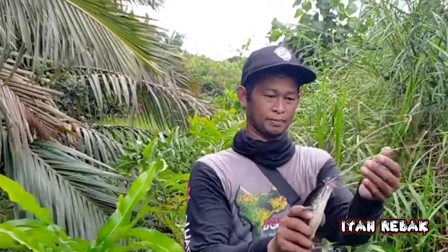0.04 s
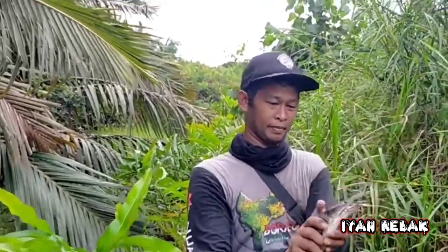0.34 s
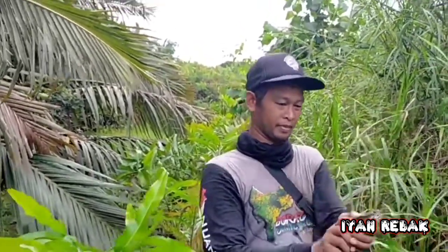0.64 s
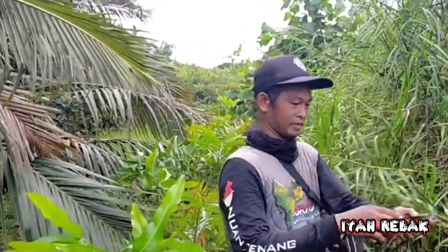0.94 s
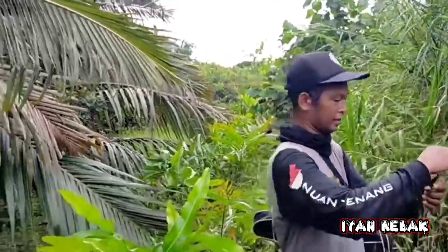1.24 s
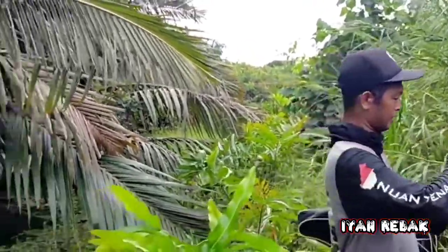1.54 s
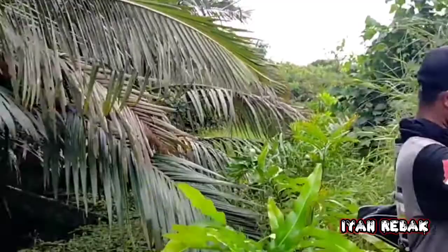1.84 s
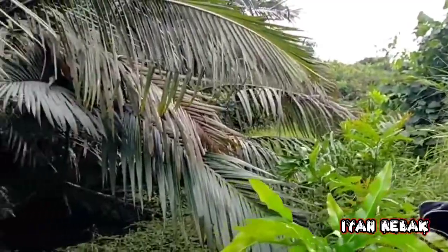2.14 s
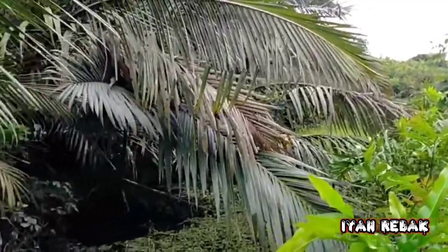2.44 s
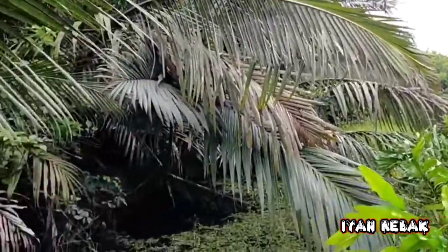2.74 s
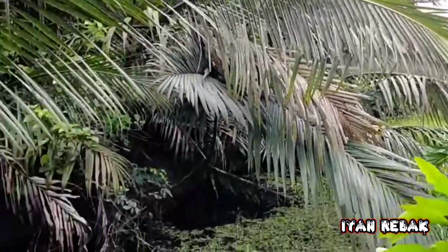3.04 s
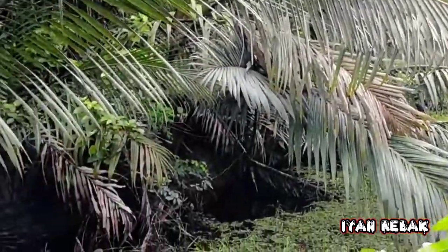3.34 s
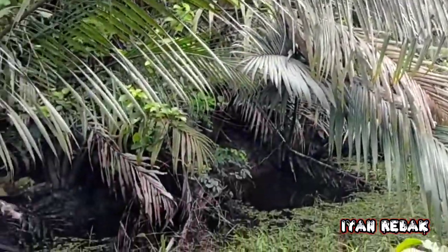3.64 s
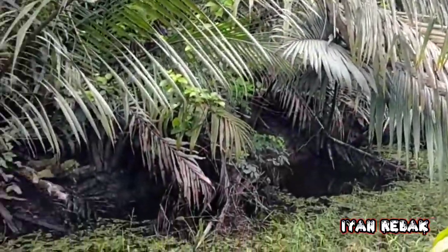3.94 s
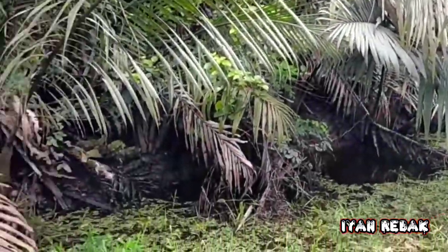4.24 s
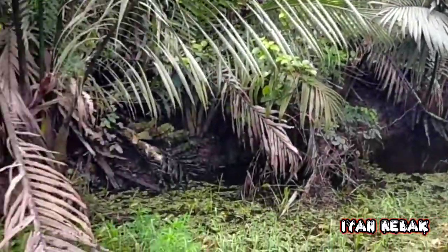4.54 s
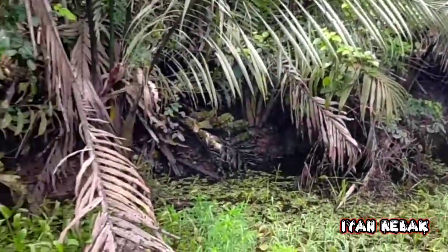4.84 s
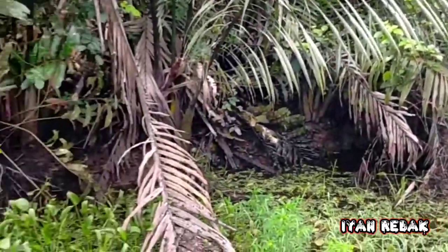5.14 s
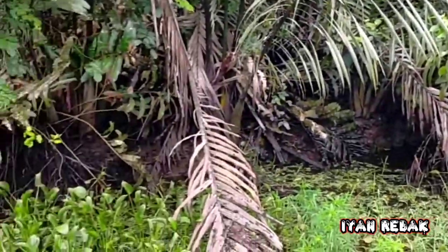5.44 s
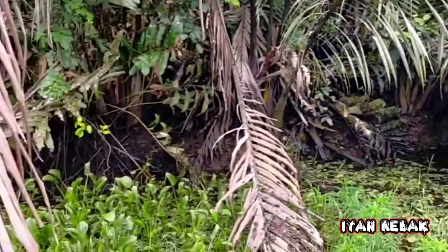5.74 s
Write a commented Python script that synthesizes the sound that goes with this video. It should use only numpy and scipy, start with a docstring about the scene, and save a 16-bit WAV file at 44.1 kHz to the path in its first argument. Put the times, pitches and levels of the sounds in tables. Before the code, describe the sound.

Close rustling, crackles and twig snaps of someone moving through a swamp thicket, under a shrill, throbbing cicada buzz.

```python
"""Cicadas in a swamp thicket

Cicadas drone on clicking tymbals: one holds its note, one sings throbbing phrases, a chorus lies behind.
Someone pushes through tall grass close by: blades swish by friction, dry leaves buckle, twigs snap,
stems knock, and something plops once in the water. A far bird peeps over a faint rumble of air.
The sound is mono, louder on the right."""
import sys
import numpy as np
from scipy import signal
from scipy.fft import rfft, irfft, next_fast_len
from scipy.io import wavfile
from scipy.ndimage import uniform_filter1d

SR = 44100
rng = np.random.default_rng(int(sys.argv[2]) if len(sys.argv) > 2 else 0)


def generate_wav(sig):
    """Save sig (samples, or channels by samples) to the path in sys.argv[1] as 16-bit PCM at SR."""
    pcm = np.round(np.clip(np.atleast_2d(sig).T, -1, 1) * 32767).astype(np.int16)
    wavfile.write(sys.argv[1], SR, pcm)


N = 254898
TIME = np.arange(N) / SR

# All levels are relative; the functions apply further gains.
# spectrum of the air's far hush: f/Hz, level/dB
HUSH_SPECTRUM = [(30, -14.5), (150, -9.5), (300, -8.5), (700, -14), (2000, -10.5), (4000, -39), (9000, -49)]
# spectrum of air buffeting the microphone: f/Hz, level/dB
BUFFET_SPECTRUM = [(5, 6.5), (15, 7.5), (35, -0.5), (60, -1), (95, -7.5), (150, -15.5), (400, -44),
                   (2000, -80)]
# the far bird's peeps: t/s, duration/s, level/dB, f/Hz, upward glide as a fraction of f
PEEPS = [(2.47, 0.09, -54, 3680, 0.023), (2.837, 0.02, -45, 1595, .04)]
# bands of the distant cicada chorus: f/Hz, width/Hz, level/dB
CHORUS_BANDS = [(6240, 160, -60.5), (7164, 580, -51), (7740, 460, -48), (7940, 510, -50),
                (8120, 570, -45.5)]
# modes of the plop: f/Hz, level/dB, 60 dB decay time/s, rise time/s
PLOP_MODES = [(248, -36.5, 0.17, 0.0053), (523, -26, 0.025, 0.0032), (987, -31, 0.022, 0.0046),
              (1130, -38, 0.062, 0.013), (1560, -35, 0.023, 0.0079)]
# spectrum radiated by brushed leaves: f/Hz, level/dB
LEAF_SPECTRUM = [(100, -10.5), (300, -13.5), (700, -8), (1300, -5.5), (2200, 2), (3100, -1.5), (4600, -7),
                 (5500, -10.5), (6800, -2.5), (8500, -5), (10200, -5), (12200, 1.5), (14300, 5),
                 (15500, 7.5)]
# grass sliding past the body: t/s, swish of broad leaves/dB, hiss of dry blades/dB
BRUSH_LEVELS = [(0.0, -48, -49), (0.16, -43.5, -45.5), (0.4, -44.5, -47.5), (0.88, -42.5, -45.5),
                (1.12, -48.5, -50.5), (1.5, -42.5, -45.5), (1.75, -43, -49), (2.2, -48, -53.5),
                (2.5, -55.5, -63), (3.05, -53, -57.5), (3.4, -43, -48), (3.49, -38.5, -41.5),
                (3.76, -35.5, -37), (4.1, -41, -46), (4.75, -37, -43), (4.97, -43.5, -48.5),
                (5.5, -45, -50.5), (5.78, -40.5, -41)]
# stems colliding: t/s, level/dB, f/Hz, 60 dB decay time/s
STEM_KNOCKS = [(1.822, -33, 750, 0.025), (3.477, -23.5, 910, 0.036), (3.655, -44, 380, .05),
               (3.914, -39, 109, .08), (4.022, -28.5, 1130, 0.021), (4.047, -30.5, 860, 0.046),
               (4.049, -35, 300, .04), (4.079, -31, 297, 0.023), (4.225, -35.5, 433, .04),
               (4.353, -35.5, 89.5, 0.11), (4.7318, -30, 1057, 0.014), (4.781, -16, 900, 0.0087)]
# the loudest dry leaves buckling: t/s, snap level/dB, body level/dB, half duration/s
LOUD_CRACKLES = [(0.469, -26, -37, 0.0083), (0.594, -24, -40, 0.0045), (0.8757, -22, -28.5, 0.0023),
                 (0.89, -25.5, -38, 0.029), (1.085, -24.5, -47.5, 0.026), (1.325, -22, -38, .007),
                 (1.3433, -20, -35.5, 0.0087), (1.547, -20, -38, .005), (1.5597, -13, -38, .0041),
                 (1.801, -18, -60, 0.0036), (1.816, -20.5, -37, 0.0075), (2.137, -20.5, -40, 0.0056),
                 (2.404, -35, -43, 0.01), (2.706, -26, -37.5, 0.002), (2.779, -24.5, -38, 0.0083),
                 (2.904, -21.5, -37.5, 0.0029), (3.0053, -26, -39, .004), (3.0356, -25.5, -38, .0059),
                 (3.109, -26.5, -46, 0.011), (3.852, -31, -35, .004), (3.974, -22, -33, .0058),
                 (4.403, -22, -36, 0.007), (4.463, -22, -37, .0055), (4.085, -18.5, -48, 0.006),
                 (4.819, -25, -33, 0.011), (5.115, -23, -49, .005), (5.1751, -23, -42, 0.0077),
                 (5.6126, -21, -38, .0047), (5.7069, -16.5, -38, 0.0088), (5.7714, -20, -38, .005)]
# twigs breaking: t/s, crack peak/dB, ring peak/dB, f/Hz
TWIG_SNAPS = [(1.5486, -20, -24, 3320), (1.6398, -9, -21, 1990), (1.6473, -17, -24.5, 1950),
              (2.458, -38, -37, 3120), (3.8405, -20, -27.5, 2970), (4.7312, -26, -26.5, 1070),
              (4.7571, -8, -23, 3030), (4.7810, -27, -19.5, 3060), (5.1755, -12, -38, 3300)]
# phrases of the throbbing cicada: start/s, end/s, level/dB
PHRASES = [(.78, 1.003, -48), (1.253, 1.56, -46), (1.85, 2.11, -46), (2.422, 2.74, -40.5),
           (2.949, 3.31, -42), (3.543, 3.983, -39.5), (4.15, 4.52, -47), (5.0, 5.39, -42.5),
           (5.573, 5.77, -42)]
# envelope of the cicada that holds its note: t/s, level/dB
HELD_NOTE_LEVEL = [(0.0, -47.5), (0.52, -39.5), (1.25, -43.5), (1.48, -39), (2.3, -41.5), (3.8, -44.5),
                   (4.05, -50), (4.4, -40.5), (4.95, -49), (5.78, -60)]


def gain_of(db):
    """Amplitude ratio of a level in decibels."""
    return 10 ** (np.asarray(db) / 20)


def unit_rms(x):
    """Normalisation to an rms of 1."""
    return x / np.sqrt(np.mean(x ** 2) + 1e-20)


def phase_of(hz):
    """Phase is the time integral of frequency."""
    return 2 * np.pi * np.cumsum(hz) / SR


def follow(rows):
    """Linear interpolation of a table's columns at every sample."""
    times, *columns = np.transpose(rows)
    return [np.interp(TIME, times, column) for column in columns]


def add(mix, start_s, sound):
    """Superposition of a sound on the mix."""
    part = mix[max(round(start_s * SR), 0):][:len(sound)]
    part += sound[:len(part)]


def colour(x, spectrum):
    """Zero-phase filtering by a table of f/Hz, level/dB."""
    f, db = np.transpose(spectrum)
    hz = np.fft.rfftfreq(len(x), 1 / SR)
    return irfft(rfft(x) * gain_of(np.interp(np.log(hz + 1), np.log(f), db)), len(x))


def wander(rate_hz):
    """Random fluctuation: noise of rms 1, low-passed near rate_hz."""
    size = next_fast_len(N)
    hz = np.fft.rfftfreq(size, 1 / SR)
    return unit_rms(irfft(rfft(rng.standard_normal(size)) * np.exp(-(hz / rate_hz) ** 2), size)[:N])


def air(hush_db=-54, buffet_db=-50, gust_db=2.5, gust_hz=8):
    """Pressure fluctuations: a far hush, and soft buffeting on the moving microphone."""
    buffet = colour(rng.standard_normal(N), BUFFET_SPECTRUM) * gain_of(gust_db * wander(gust_hz))
    hush = colour(rng.standard_normal(N), HUSH_SPECTRUM)
    return gain_of(hush_db) * unit_rms(hush) + gain_of(buffet_db) * unit_rms(buffet)


def far_bird(jitter=0.025):
    """Rising whistles; random frequency modulation stands for their blurring by leaves."""
    out, blur = np.zeros(N), jitter * wander(350)
    for start, length_s, db, hz, glide in PEEPS:
        progress = np.linspace(0, 1, round(length_s * SR))
        pitch = hz * (1 + glide * progress + blur[round(start * SR):][:len(progress)])
        add(out, start, gain_of(db) * np.sin(np.pi * progress) * np.sin(phase_of(pitch)))
    return out


def resonant_noise(hz, width_hz):
    """Narrow-band noise of rms 1: a steep resonance, centred on hz, under random excitation."""
    carrier = np.exp(1j * phase_of(hz * np.ones(N)))
    pole = np.exp(-np.pi * width_hz / SR)
    baseband = signal.lfilter([1], [1, -2 * pole, pole ** 2], rng.standard_normal(N) / carrier)
    return unit_rms((carrier * baseband).real)


def far_cicadas(pitch_hz=7230, drift_hz=45, level_db=-47, swell_db=0.9, pulse_hz=47, depth=0.086):
    """Incoherent summation: many singers blur into steady bands, behind a few that pulse and drift."""
    hz = pitch_hz + drift_hz * wander(0.81)
    pulse = 1 + depth * np.sin(phase_of(pulse_hz * (1 + 0.0079 * wander(5.6))))
    singers = gain_of(level_db + swell_db * wander(1.8)) * pulse * resonant_noise(hz, width_hz=220)
    return singers + sum(gain_of(db) * resonant_noise(f, width) for f, width, db in CHORUS_BANDS)


def plop(start_s=0.9615):
    """Cavity resonance: the modes of a hollow pocket in the water swell, then decay exponentially."""
    t, out = np.arange(SR // 3) / SR, np.zeros(N)
    for hz, db, t60, rise_s in PLOP_MODES:
        rise = np.minimum(t / rise_s, 1) ** 2
        decay = gain_of(db - 60 * np.maximum(t - rise_s, 0) / t60)
        add(out, start_s, np.sin(2 * np.pi * hz * t) * rise * decay)
    return out


def brushed_grass(slips_per_s=7000, spread_db=2.5, flicker_db=1.47, blades_db=1.5, tips_db=14):
    """Stick-slip friction: blades slide in countless tiny impulses, clumped as they catch and let go."""
    swish_db, hiss_db = follow(BRUSH_LEVELS)
    clumps = gain_of(wander(19) + 0.36 * wander(250))
    slips = (rng.random(N) < slips_per_s / SR) * rng.choice([-1, 1], N)
    strength = gain_of(spread_db * np.minimum(rng.exponential(1, N), 5))
    friction = unit_rms(slips * strength) + 0.42 * rng.standard_normal(N)
    rustle = rfft(colour(friction * clumps, LEAF_SPECTRUM))
    leaves_hz, blades_hz, tips_hz = [900, 1700, 2400, 3300, 5000], [8000, 12500], [15000]
    centres, hz = np.array(leaves_hz + blades_hz + tips_hz), np.fft.rfftfreq(N, 1 / SR)

    def flickering(group):
        """Independent modulation of overlapping bands, as leaves of different sizes come and go."""
        bands = (irfft(rustle * np.interp(hz, centres, centres == centre), N) for centre in group)
        return unit_rms(sum(band * gain_of(flicker_db * wander(30)) for band in bands))

    swish = gain_of(swish_db) * flickering(leaves_hz)
    hiss = gain_of(hiss_db + blades_db) * flickering(blades_hz)
    sizzle = gain_of(hiss_db + tips_db) * flickering(tips_hz)
    return swish + hiss + sizzle


def stem_knocks(gain_db=-2, rise_s=0.0021, spread_oct=0.55):
    """Impact excitation: damp stems collide, each giving a rough, heavily damped note."""
    t, out = np.arange(SR // 5) / SR, np.zeros(N)
    for start, db, hz, t60 in STEM_KNOCKS:
        band = signal.butter(2, [hz / 2 ** spread_oct, hz * 2 ** spread_oct], "band", fs=SR, output="sos")
        roughness = unit_rms(signal.sosfilt(band, rng.standard_normal(len(t))))
        note = 0.99 * np.sin(2 * np.pi * hz * t) + roughness
        envelope = (1 - np.exp(-t / rise_s)) * gain_of(-60 * t / t60)
        add(out, start, gain_of(db + gain_db) * np.sqrt(np.mean(envelope ** 2)) * unit_rms(note * envelope))
    return out


def leaf_responses(split_hz=6000):
    """Impulse responses of a leaf, each of energy 1: its low body and its high snap."""
    click = colour(signal.unit_impulse(512, "mid"), LEAF_SPECTRUM)
    filters = [signal.butter(3, split_hz, kind, fs=SR, output="sos") for kind in ("low", "high")]
    halves = [signal.sosfilt(sos, click) for sos in filters]
    return [half / np.linalg.norm(half) for half in halves]


def damped_mode(hz, decay_cycles):
    """Free vibration of a leaf or twig, of energy 1."""
    cycles = hz * np.arange(400) / SR
    note = np.sin(2 * np.pi * cycles) * np.exp(-cycles / decay_cycles) * (1 - np.exp(-cycles))
    return note / np.linalg.norm(note)


def small_crackles(per_s=9, snap_db=-28.5, body_db=-40.5, spread_db=3, growth=0.5, half_s=0.0044):
    """A jittered pulse train of lesser leaves, louder with the swish; rows as in LOUD_CRACKLES."""
    swish_db, _ = follow(BRUSH_LEVELS)
    push_db = growth * (swish_db - swish_db.mean())
    rows = []
    for slot, (place, snap, body, length) in enumerate(rng.uniform(-1, 1, (200, 4))):
        start = (slot + 0.5 + place / 2) / per_s
        if start < TIME[-1]:
            db = np.interp(start, TIME, push_db)
            high_db, low_db = db + snap_db + spread_db * snap, db + body_db + spread_db * body
            rows.append((start, high_db, low_db, half_s * 2 ** length))
    return rows


def leaf_crackles(leaf_hz=2440, spread_oct=0.18, snap_db=-4, body_db=0.5, note_ratio=1.08,
                  swell_s=0.0032, tail_db=-19, tail_s=0.043, grit_db=0.2):
    """Buckling: a quick crunch rings each dry leaf at its own pitch; scattering adds a short tail."""
    t, out = np.arange(-SR // 50, SR // 12) / SR, np.zeros(N)
    body, snap = leaf_responses()
    for start, high_db, low_db, half_s in list(LOUD_CRACKLES) + small_crackles():
        hz = leaf_hz * 2 ** (spread_oct * rng.standard_normal())
        age = t - swell_s
        crunch = np.exp(-(age / (half_s * np.where(age < 0, 0.5, 1))) ** 2)  # rises faster than it falls
        tail = gain_of(tail_db) * np.exp(-abs(age) / tail_s) * (t > 0)
        leaf_noise, note_noise, grit = rng.standard_normal((3, len(t)))
        force = (crunch + tail) * gain_of(grit_db * unit_rms(uniform_filter1d(grit, 30)))
        note = signal.fftconvolve(note_noise * force, damped_mode(hz, decay_cycles=1.18))[:len(t)]
        low = signal.fftconvolve(leaf_noise * force, body, "same") + note_ratio * note
        low *= gain_of(low_db + body_db) / np.hypot(1, note_ratio)
        high = gain_of(high_db + snap_db) * signal.fftconvolve(leaf_noise * force, snap, "same")
        add(out, start + t[0], low + high)
    return out


def twig_snaps(tear_s=0.0012, splinter=0.37):
    """Brittle fracture: fibres tear in about a millisecond and the wood rings for a few cycles."""
    _, snap = leaf_responses()
    t, out = np.arange(SR // 100) / SR, np.zeros(N)
    for start, crack_db, ring_db, hz in TWIG_SNAPS:
        fibres = rng.standard_normal(len(t)) * np.exp(-t / tear_s)
        crack = np.convolve(fibres, snap)
        force = signal.unit_impulse(len(t)) + splinter * fibres
        wood = np.convolve(force, damped_mode(hz, decay_cycles=1.36))
        add(out, start - len(snap) / 2 / SR, gain_of(crack_db) * crack / abs(crack).max())
        add(out, start, gain_of(ring_db) * wood / abs(wood).max())
    return out


def tymbal(hz, flutter_db, waver_hz):
    """Tymbal resonance, rms 1: uneven clicking is heard as random amplitude and frequency modulation."""
    tone = np.sin(phase_of(hz + waver_hz * wander(57)))
    return unit_rms(tone * gain_of(flutter_db * wander(190)))


def throbbing_cicada(pitch_hz=8130, throb_hz=17, throb_db=4.5, bend_hz=20, scoop_hz=70, scoop_s=0.1):
    """Coupled modulation: the pumping abdomen lifts level and pitch together."""
    effort, hz = np.zeros(N), np.full(N, float(pitch_hz))
    for start, end, db in PHRASES:
        on = (TIME >= start) & (TIME < end)
        effort[on] = gain_of(db) * signal.windows.tukey(on.sum(), 0.25)
        hz[on] -= scoop_hz * np.exp(-(TIME[on] - start) / scoop_s)  # each phrase climbs to its pitch
    throb = np.sin(phase_of(throb_hz * (1 + 0.074 * wander(4))))
    tone = tymbal(hz + bend_hz * throb, flutter_db=3, waver_hz=19.2)
    return effort * unit_rms(gain_of(throb_db * throb) * tone)


def held_cicada(pitch_hz=8055, drift_hz=11.7, tone_db=-2.5, buzz_db=-7,
                throb_hz=17, throb_db=1.5, swell_db=1.5):
    """Shallow amplitude modulation of one held tymbal note and its fringe of narrow-band buzz."""
    level_db, = follow(HELD_NOTE_LEVEL)
    hz = pitch_hz + drift_hz * wander(3.66)
    throb = np.sin(phase_of(throb_hz * (1 + 0.132 * wander(5.9))))
    tone = gain_of(tone_db) * tymbal(hz, flutter_db=2.5, waver_hz=20.98)
    buzz = gain_of(buzz_db) * resonant_noise(hz, width_hz=260)
    sway = gain_of(throb_db * throb + swell_db * wander(16))
    return gain_of(level_db) * unit_rms(sway * (tone + buzz))


def scene(left_db=-4.5, right_db=3):
    """Superposition of all sources at one point, fed unequally to the two channels."""
    insects = held_cicada() + throbbing_cicada() + far_cicadas()
    swamp = plop() + far_bird() + air()
    thicket = brushed_grass() + twig_snaps() + stem_knocks() + leaf_crackles()
    return (insects + swamp + thicket) * gain_of([[left_db], [right_db]])


def record(dry, cutoff_hz=15500):
    """Band limiting by a steep, linear-phase low-pass filter."""
    lowpass = signal.firwin(1023, cutoff_hz, window=("kaiser", 9), fs=SR)
    return signal.oaconvolve(dry, lowpass[None], "same", axes=1)


dry = scene()
out = record(dry)
generate_wav(out)
```